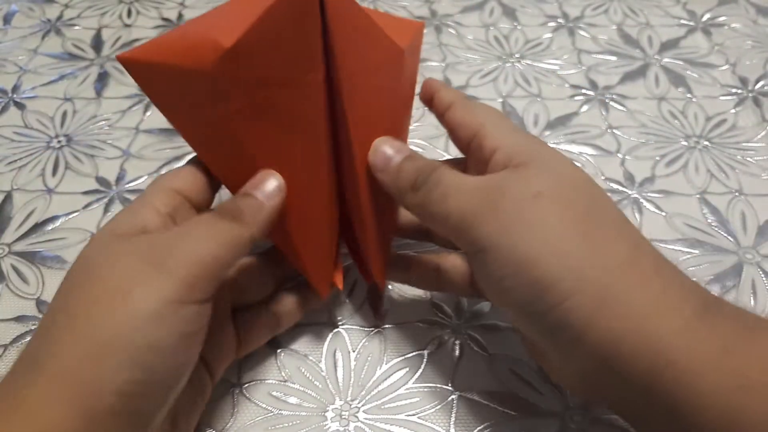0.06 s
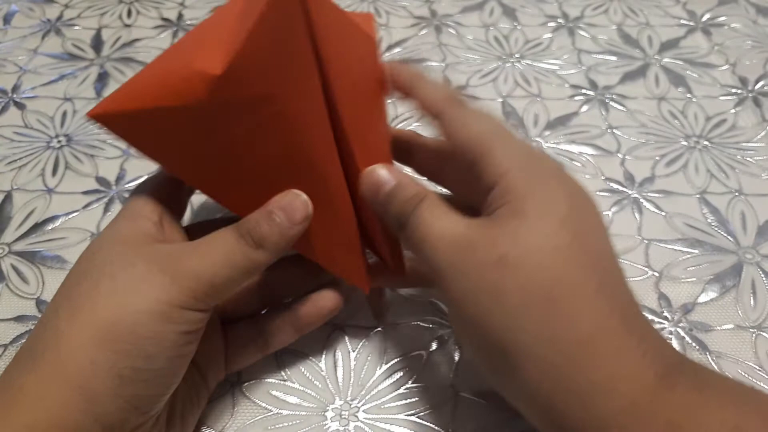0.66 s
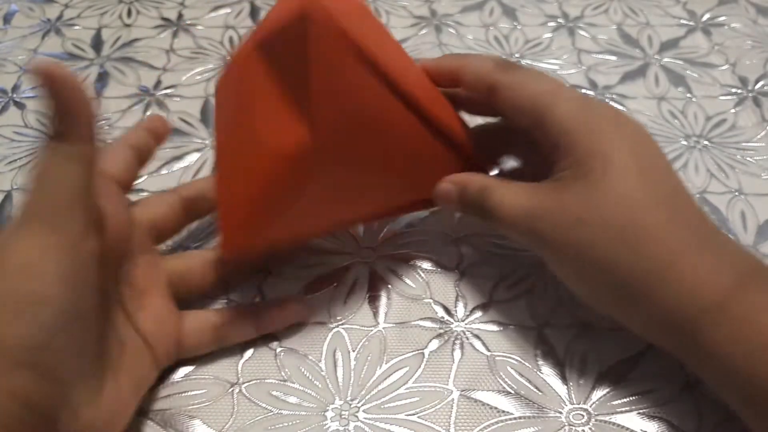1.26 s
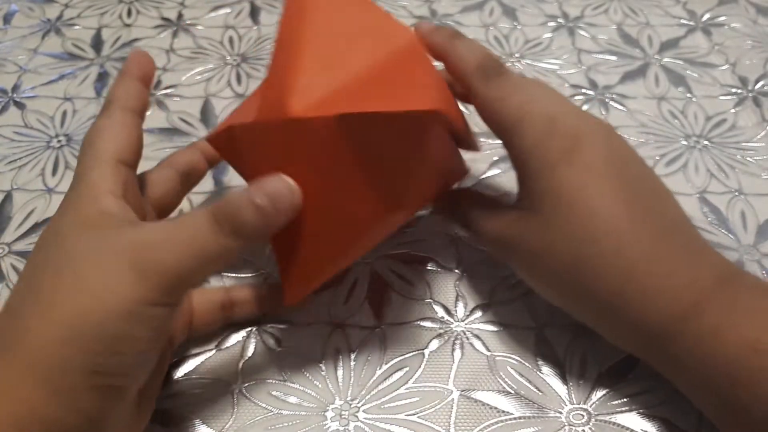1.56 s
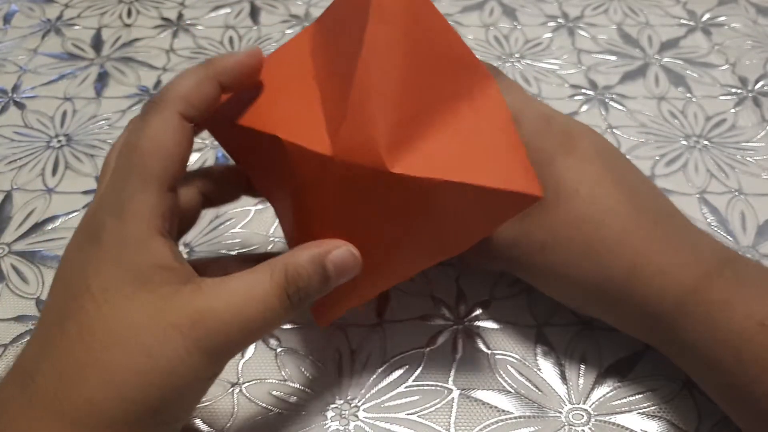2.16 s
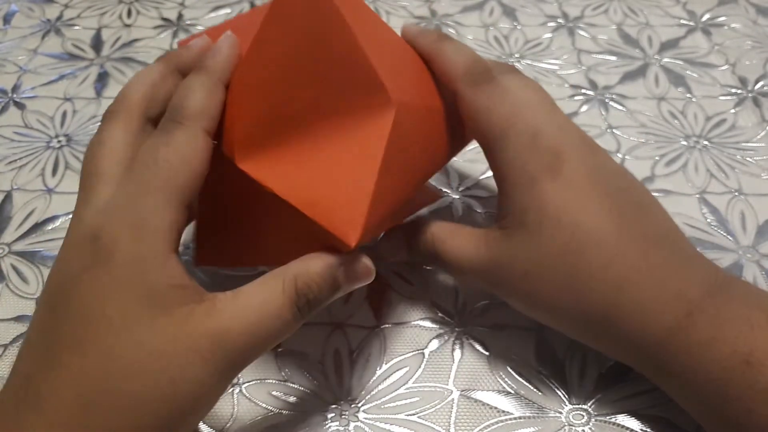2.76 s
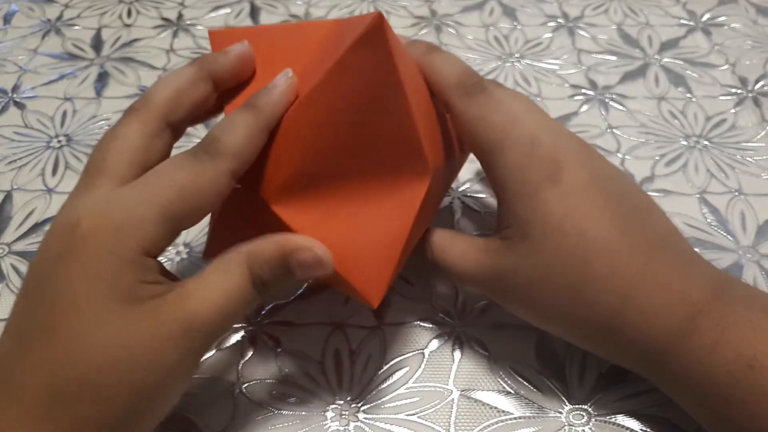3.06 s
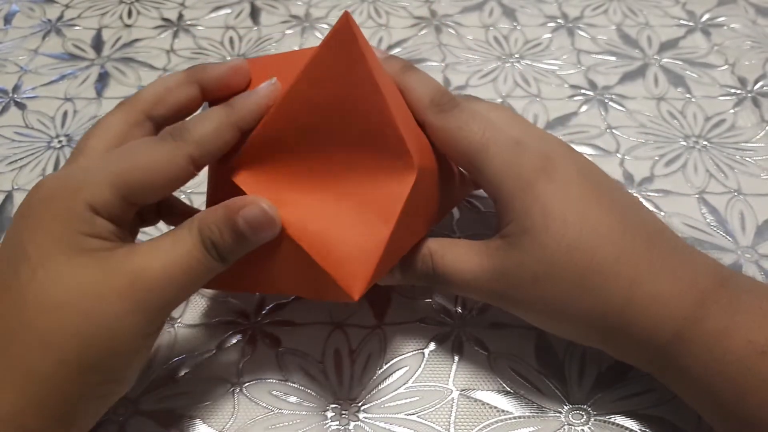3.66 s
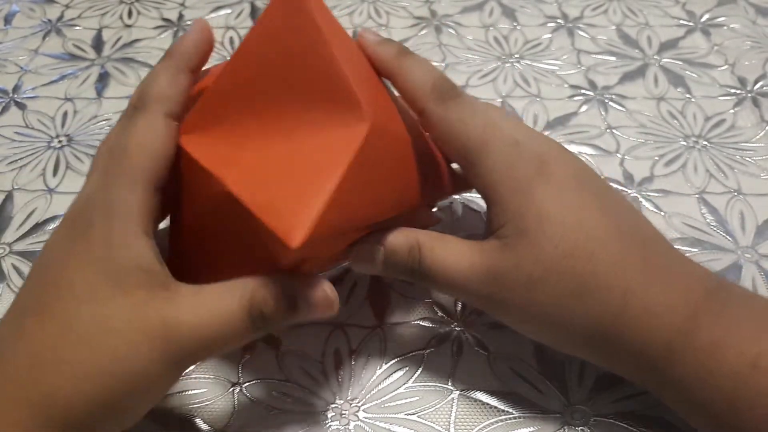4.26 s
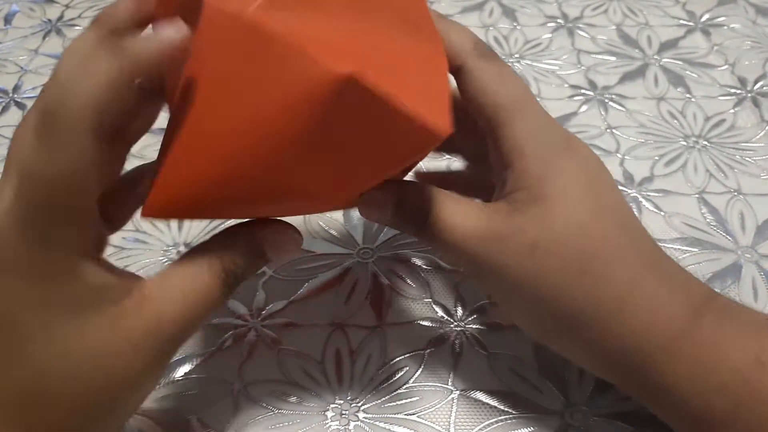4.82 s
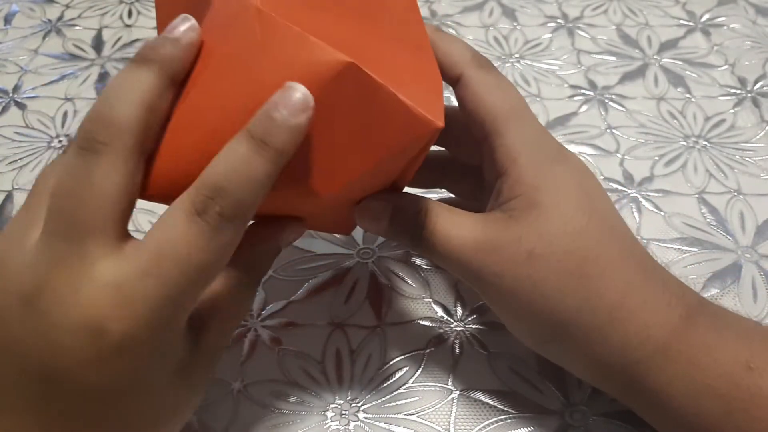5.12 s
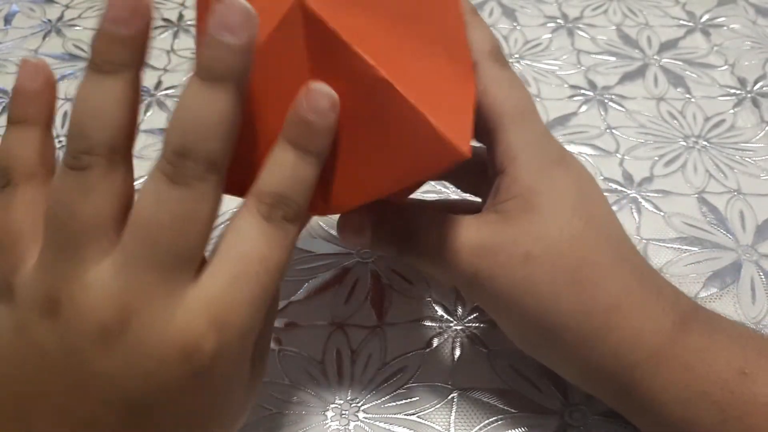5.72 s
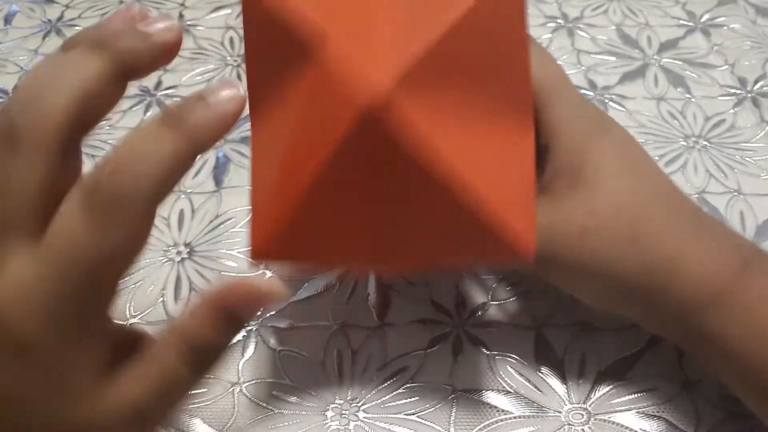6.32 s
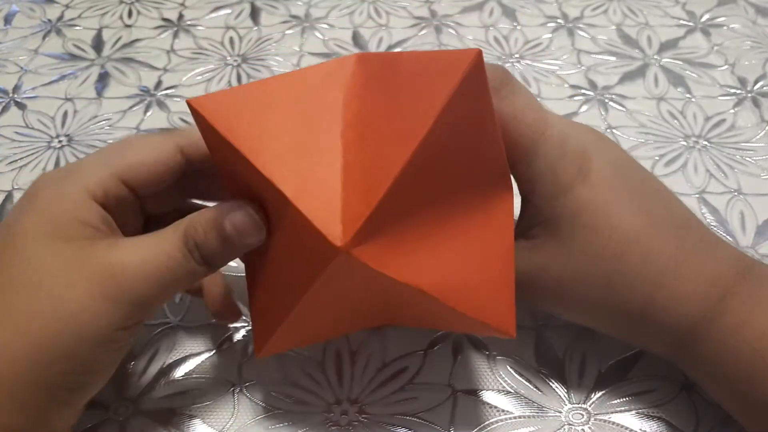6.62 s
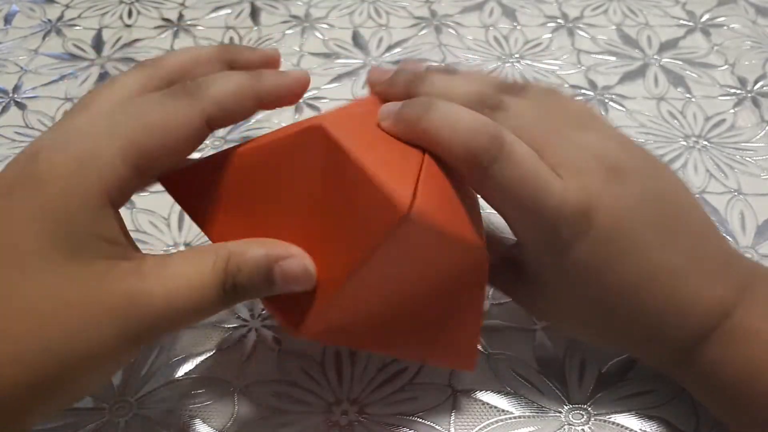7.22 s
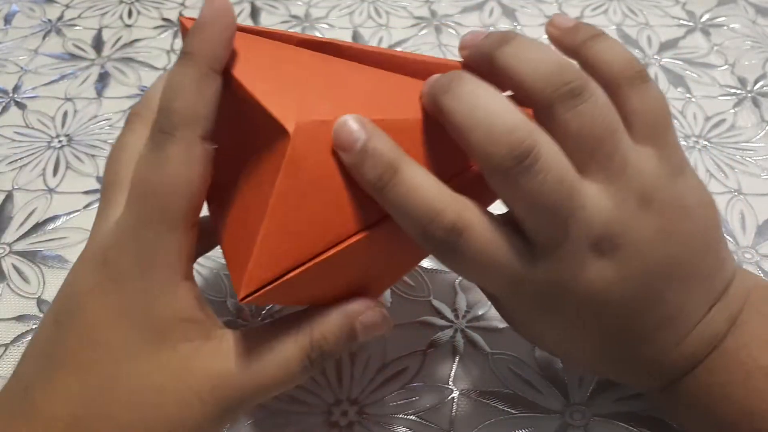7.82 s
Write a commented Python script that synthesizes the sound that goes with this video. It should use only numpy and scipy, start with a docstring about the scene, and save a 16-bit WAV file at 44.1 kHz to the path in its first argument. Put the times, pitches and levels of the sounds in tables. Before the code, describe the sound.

Two hands open out a folded paper model over a table in a small room. Fingers slide and rub on the sheet with a soft hiss and scuff, while creases tick and stiff panels buckle with short, dull snaps. The snaps come irregularly, with a strong one near the middle and another at the very end. The paper sounds close and slightly left, over a low motor hum and a rumble of air.

```python
"""A small room, where two hands open out a folded paper model over a table.
Stiff panels buckle with dull snaps and creases tick: each sudden slip excites damped modes of the
paper, and the walls reflect the sound. Fingers slide and rub on the sheet, whose stick-slip friction
gives a hiss and a scuff. Behind them a motor, probably a fan, hums over a rumble of moving air."""
import sys
import numpy as np
from scipy import signal
from scipy.fft import rfft, irfft, next_fast_len
from scipy.io import wavfile
from scipy.ndimage import uniform_filter1d

SR = 44100
rng = np.random.default_rng(int(sys.argv[2]) if len(sys.argv) > 2 else 0)


def master_out(mix):
    """Clip the mix to full scale and print it as 16-bit PCM to the path in sys.argv[1]."""
    frames = np.transpose(np.atleast_2d(mix))
    ceiling = np.clip(frames, -1, 1)
    pcm = np.round(ceiling * 32767).astype(np.int16)
    wavfile.write(sys.argv[1], SR, pcm)


N = 351917

# Levels in the tables are relative; each source applies its own gain.
# Spectrum of the moving air: frequency_hz, level_db
RUMBLE_SPECTRUM = [(25, -16), (45, -21.5), (90, -16.5), (150, -10), (240, -7), (400, -10), (600, -20.5),
                   (900, -16), (1400, -25), (2900, -30), (3500, -41), (7400, -35.5), (8400, -46),
                   (16000, -51)]
# Likeness of the rumble on the two sides: frequency_hz, coherence (capped at 1)
RUMBLE_COHERENCE = [(60, 1.2), (140, 0.7), (290, 0.86), (640, 0.53), (1400, 0)]
# Lean of the rumble: frequency_hz, left_minus_right_db
RUMBLE_BALANCE = [(100, 0.59), (250, 1.3), (700, 4.3), (5000, 4), (15000, 2.4)]
# Slow swell of the hum: time_s, level_db
HUM_SWELL = [(0, -67), (.29, -49), (.47, -59), (.84, -51), (1.2, -57), (1.83, -47.5), (2.09, -55.5),
             (2.25, -50.5), (2.67, -52.5), (2.8, -48.5), (3.07, -54.5), (3.19, -66), (3.4, -52),
             (3.81, -53), (4.03, -61), (4.2, -52.5), (4.62, -47), (4.73, -61), (4.99, -59), (5.09, -52.5),
             (5.34, -58.5), (5.43, -50.5), (6.06, -51), (6.44, -50.5), (6.79, -53.5), (6.89, -49),
             (7.42, -62), (7.61, -47), (7.89, -56.5)]
# Weaker motor tones: pitch_hz, level_db
MOTOR_TONES = [(100, -66.5), (300, -65), (352, -64.5), (801, -67.5)]
# Reverberation time of the room: frequency_hz, t60_s
ROOM_DECAY = [(200, 0.34), (600, 0.48), (1050, 0.22), (1600, 0.35), (2800, 0.39), (3800, 0.23),
              (10000, 0.08)]
# Modes of a hard object nearby: pitch_hz, width_hz, level_db
NEARBY_MODES = [(1685, 9, -3.5), (3030, 12, -13)]
# Finger strokes: peak_s, rise_s, fade_s, hiss_db, air_db, scuff_db
FINGER_STROKES = [(.03, 0.27, 0.067, -65, -89, -64), (.23, 0.17, 0.71, -62, -71.5, -69),
                  (.45, 0.037, 0.16, -64, -76, -64.5), (.63, 0.046, 0.21, -62, -77, -58.5),
                  (.845, 0.052, 0.59, -60, -72, -64), (1.06, 0.1, 0.086, -60, -75, -65),
                  (1.19, 0.13, 0.12, -62.5, -70.5, -86), (1.442, 0.13, 0.14, -57, -64.5, -59),
                  (1.6, 0.2, 0.53, -62, -72, -59.5), (2.22, 0.11, 0.49, -65.5, -76, -70),
                  (2.46, 0.036, 0.1, -64.5, -68.5, -78), (2.86, 0.2, 0.17, -58, -66.5, -63.5),
                  (3.1, 0.5, 1, -66, -81, -70.5), (3.285, 0.06, 0.082, -60, -65.5, -66),
                  (3.67, 0.05, 0.25, -64, -80, -62), (3.89, 0.07, 0.13, -59, -76, -61),
                  (4.02, 0.12, 0.088, -63, -75, -68), (4.33, 0.18, 0.23, -61, -78, -75),
                  (4.56, 0.55, 0.54, -62, -70.5, -66), (4.79, 0.061, 0.077, -61.5, -70, -67),
                  (4.93, 0.084, 0.17, -58.5, -67, -59), (4.945, .02, .025, -66, -61, -76),
                  (4.992, 0.018, 0.032, -63, -61, -55), (5.175, 0.028, 0.044, -58.5, -63, -76),
                  (5.27, 0.14, 0.22, -71, -78, -74), (5.62, 0.31, 0.15, -60, -73, -60),
                  (5.75, 0.11, 0.19, -59.5, -67, -72), (5.915, 0.044, .04, -63, -66, -76),
                  (5.98, 0.32, 0.15, -62, -70, -61), (6.008, .025, .025, -55, -66, -70),
                  (6.72, 0.3, 0.4, -67, -79, -69), (7.265, 0.54, 0.16, -67, -92, -65),
                  (7.335, 0.12, 0.13, -56.5, -72, -70), (7.47, 0.049, 0.091, -64.5, -72, -65),
                  (7.57, 0.058, 0.22, -68, -82, -66), (7.75, 0.2, 0.19, -60.5, -73, -66.5),
                  (7.91, 0.05, 0.46, -61, -74, -61.5)]
# Friction of hands that merely hold the paper: hiss_db, air_db, scuff_db
HOLDING_LEVELS = [-75.5, -95, -101]
# Spectrum of a sliding finger: frequency_hz, level_db
SLIDE_SPECTRUM = [(200, -58), (500, 1), (1000, 8), (2000, -3.5), (2900, 6), (3500, 2.5), (5000, 0.5),
                  (7400, -1.5), (8400, -11.5), (11500, -13), (16000, -32)]
# Spectrum of a dragging grip: frequency_hz, level_db
RUB_SPECTRUM = [(150, -22), (400, -2.5), (850, -2.5), (1200, -3), (1700, -8), (2300, -12), (3100, -21),
                (3800, -14), (8000, -42)]
# Modes of the folded sheet: pitch_hz, width_hz, level_db
SHEET_MODES = [(430, 110, 8), (770, 114, 10), (1070, 58, 2), (1650, 240, -3)]
# Spectrum of cracking fibres: frequency_hz, level_db
FIBRE_SPECTRUM = [(500, -40), (2500, 2), (3700, 7), (4900, 2), (6600, -2.5), (7600, -3.5), (8500, -16),
                  (11500, -11), (16000, -17)]
# Creases that slip at random: pitch_hz
STRAY_PITCHES = [3000, 5200, 9500]
# The two modes of a ticking crease: ratio_to_pitch
CREASE_MODES = [0.876, 1.135]
# Crease slips and fingertip landings: start_s, body_db, crack_db, crack_hz, slip_ms
CREASE_TICKS = [(.1015, -54, -73, 4000, 0.27), (.217, -63, -62, 6000, .55), (.426, -59, -74, 3000, 0.4),
                (.445, -59, -64, 5000, 0.64), (.474, -54.5, -65, 4020, 0.39),
                (0.562, -58, -65.5, 7000, 0.74), (0.622, -48, -56.5, 9400, 2.3),
                (.64, -56, -63, 11000, 1.7), (.678, -71, -57, 4360, 0.14), (.823, -64, -62.5, 6500, 3.4),
                (0.862, -54, -61.5, 6500, 1), (.894, -54.5, -58.5, 4450, 0.77),
                (0.9156, -59, -62, 9500, 1.2), (.96, -55, -53.5, 12000, 2), (.992, -53, -66, 5000, 0.6),
                (1.017, -61.5, -72, 4000, 0.44), (1.05, -67, -62, 3500, 0.48), (1.073, -58, -63, 6630, 1.7),
                (3.06, -54.5, -60, 5500, 3.5), (3.458, -53, -69, 4000, 2), (3.483, -53.5, -69, 4000, 3.1),
                (3.586, -59, -61, 6430, 2.6), (3.607, -56, -70, 6040, 1.2), (3.614, -59, -56, 5000, 0.97),
                (4.546, -58, -64, 3000, 0.71), (4.588, -62, -65, 6960, 2), (4.719, -75, -76, 6700, .5),
                (4.731, -62, -58.5, 6300, 0.47), (4.778, -61, -65.5, 6000, 1.4),
                (4.908, -60.5, -68, 9000, .8), (4.93, -61, -54.5, 11100, 1.7), (4.984, -59, -62, 9000, 4.8),
                (5.003, -52, -58.5, 3400, 0.94), (5.66, -56.5, -54.5, 11500, 2.7),
                (5.688, -54.5, -55, 3000, 0.53), (5.703, -48, -52.5, 11600, 4.6),
                (5.782, -56, -77, 10500, 1.7), (5.814, -57, -65.5, 10500, 2.6),
                (5.8448, -53.5, -65, 9000, 1.6), (5.9, -50, -88, 3000, 0.46),
                (5.92, -51.5, -67, 5000, 1.15), (6.122, -63, -75, 7100, .7),
                (6.748, -71, -64.5, 5300, 0.73), (7.111, -60, -69, 6800, 1.5),
                (7.237, -60, -61.5, 8200, 1.4), (7.247, -70, -63.5, 8100, 1),
                (7.326, -58.5, -66, 8000, 1.6), (7.333, -58, -61, 6500, 0.61),
                (7.347, -76, -70, 11000, 1.1), (7.553, -61, -60.5, 7300, 2.1), (7.562, -64, -64, 7500, 2.7),
                (7.602, -66, -63, 5000, 1.1)]
# Bandwidths of hollow, panel, facet and crease: width_to_pitch_ratio
SNAP_WIDTHS = [0.82, 0.42, 0.29, 0.19]
# Buckling panels: start_s, knock_db, hollow_hz, hollow_db, panel_hz, panel_db, facet_hz, facet_db,
# crease_hz, crease_db, crack_db, crack_hz, left_minus_right_db, flutter_ms
PANEL_SNAPS = [(0.0484, -55, 440, -49, 793, -42, 1470, -46.5, 2600, -80, -74, 4560, -2, 0.52),
               (0.6076, -60, 400, -52, 806, -52, 1750, -64.5, 3080, -51.5, -54, 5100, 0.5, 0.46),
               (0.6277, -47.5, 555, -41.5, 900, -39.5, 1670, -39.5, 2880, -40.5, -48, 5400, -5.5, 0.36),
               (2.193, -52, 334, -44, 834, -42, 1790, -50, 5100, -46, -47.5, 11500, -3, 0.23),
               (2.8974, -48, 326, -42, 930, -40.5, 1650, -68, 3000, -64, -73, 4500, -1, 0.85),
               (2.9032, -62, 516, -44, 1090, -41.5, 1700, -39, 3430, -40.5, -52, 5500, -6, 0.49),
               (3.4419, -64, 390, -52.5, 790, -48, 1500, -87.5, 2700, -86, -78, 4500, -4, 0.58),
               (3.6313, -46.5, 480, -44, 930, -30.5, 2130, -40, 2940, -40.5, -39.5, 5400, -2, 0.38),
               (5.289, -62, 400, -76, 744, -53.5, 1490, -82, 2630, -84, -84, 4500, -1, 0.12),
               (5.4686, -52, 580, -39, 900, -41.5, 1600, -34, 2850, -45.5, -47, 5800, 0, 0.35),
               (6.0008, -68, 400, -73, 755, -43, 1400, -46, 2520, -50, -66, 6000, -3.5, 0.71),
               (7.8125, -75, 400, -66, 810, -50, 1550, -46.5, 2870, -46.5, -55, 5500, -0.5, 0.31),
               (7.9533, -38, 310, -39, 790, -42.5, 1520, -40, 2720, -43.5, -52.5, 5600, 0, 0.98)]
# Dips in the microphone's response: centre_hz, width_hz, depth_fraction
MIC_NOTCHES = [(3630, 300, 0.4), (8480, 1260, 0.3)]


def amp(db):
    """Amplitude ratio of a level in decibels."""
    return 10 ** (np.asarray(db) / 20)


def unit(x):
    """Normalisation to rms 1."""
    return x / np.sqrt(np.mean(x ** 2) + 1e-20)


def curve_at(points, hz):
    """Interpolation on a logarithmic frequency axis."""
    frequencies, values = np.transpose(points)
    return np.interp(np.log(hz + 1), np.log(frequencies + 1), values)


def add(mix, start_s, sound):
    """Superposition of a sound on the mix."""
    part = mix[:, max(round(start_s * SR), 0):][:, :sound.shape[1]]
    part += sound[:, :part.shape[1]]


def drift(rate_hz):
    """Slow random modulation: low-passed noise of rms 1."""
    size = next_fast_len(N)
    hz = np.fft.rfftfreq(size, 1 / SR)
    return unit(irfft(rfft(rng.standard_normal(size)) / (1 + (hz / rate_hz) ** 4), size)[:N])


def colour(x, spectrum, size=2048):
    """Minimum-phase filtering to a given spectrum."""
    log_gain = np.log(amp(curve_at(spectrum, abs(np.fft.fftfreq(size, 1 / SR)))))
    taps = np.fft.ifft(np.exp(np.conj(signal.hilbert(log_gain)))).real
    return signal.oaconvolve(x, taps[None, :size // 2])[:, :x.shape[1]]


def whiten(x, width_hz=240):
    """Inverse filtering levels the broad spectral humps of a burst."""
    hz = np.fft.rfftfreq(x.shape[1], 1 / SR)
    power = (abs(rfft(x)) ** 2).mean(0)
    bins = max(round(width_hz / hz[1]), 3)
    power = uniform_filter1d(uniform_filter1d(power, bins), bins)
    return colour(x, np.column_stack([hz, -10 * np.log10(power / power.mean() + 1e-6)]))


def ring(x, hz, width_hz):
    """Second-order resonance of peak gain 1."""
    return signal.lfilter(*signal.iirpeak(hz, hz / width_hz, fs=SR), x)


def mode(x, hz, width_ratio):
    """Two resonators in cascade give a damped mode with steep sides."""
    width_hz = min(width_ratio * hz, SR / 3)
    return unit(ring(ring(x, hz, width_hz), hz, width_hz))


def soften(x, edge_hz):
    """A soft contact acts as a low-pass filter."""
    return signal.sosfilt(signal.butter(2, min(edge_hz, SR / 3), fs=SR, output="sos"), x)


def place_left(x, right_db, delay_samples=5):
    """Path difference: the farther, right microphone hears the paper later and softer."""
    return np.array([x[0], amp(right_db) * np.pad(x[1], (delay_samples, 0))[:N]])


def air_rumble():
    """Spatial coherence: air and room noise are alike on both sides in the bass, unrelated higher up."""
    hz = np.fft.rfftfreq(N, 1 / SR)
    left, independent = rfft(rng.standard_normal((2, N)))
    coherence = np.clip(curve_at(RUMBLE_COHERENCE, hz), -1, 1)
    right = coherence * left + np.sqrt(1 - coherence ** 2) * independent
    lean_db = curve_at(RUMBLE_BALANCE, hz) / 2
    both = np.array([left * amp(lean_db), right * amp(-lean_db)])
    return amp(-50) * unit(irfft(both * amp(curve_at(RUMBLE_SPECTRUM, hz)), N))


def motor_tone(pitch_hz, wander_hz, wander_rate_hz, waver_db, waver_rate_hz):
    """Random frequency and amplitude modulation make a sinusoid waver."""
    phase = 2 * np.pi * np.cumsum(pitch_hz + wander_hz * drift(wander_rate_hz)) / SR
    return unit(np.sin(phase) * amp(waver_db * drift(waver_rate_hz)))


def motor():
    """Periodic vibration gives a line spectrum: a swelling hum and a few weaker tones."""
    swell = amp(0.5 + np.interp(np.arange(N) / SR, *np.transpose(HUM_SWELL)))
    hum = swell * motor_tone(199.8, wander_hz=1.49, wander_rate_hz=8.2, waver_db=2.54, waver_rate_hz=18)
    for hz, db in MOTOR_TONES:
        tone = motor_tone(hz, wander_hz=2.445, wander_rate_hz=6.92, waver_db=3.1, waver_rate_hz=20.5)
        hum += amp(db) * tone
    return hum * amp([[0.6], [-0.6]])


def room_response(size=17640, reflections_per_s=4000):
    """Reverberation: sparse reflections decay exponentially, each band at its own rate."""
    taps = rng.choice([-1., 1.], (2, size)) * (rng.random((2, size)) < reflections_per_s / SR)
    taps[:, :SR // 400] = 0  # gap before the first reflection
    hz, t, bands = signal.stft(whiten(taps), SR, nperseg=128)
    tail = signal.istft(bands * amp(-60 * t / curve_at(ROOM_DECAY, hz)[:, None]), SR)[1]
    return tail / np.linalg.norm(tail, axis=1, keepdims=True)


def nearby_object(x):
    """Sympathetic resonance: something hard rings on after the snaps and ticks."""
    return sum(amp(db) * ring(x, hz, width_hz) for hz, width_hz, db in NEARBY_MODES)


def stroke_envelopes(points=4000, depth_db=16, rise_power=1.1, fade_power=1.07):
    """Incoherent strokes add in power; returns the gains of hiss, airy top and scuff."""
    t = np.linspace(0, N / SR, points)
    power = np.outer(amp(HOLDING_LEVELS) ** 2, np.ones(points))
    for peak_s, rise_s, fade_s, *levels_db in FINGER_STROKES:
        away_s = abs(t - peak_s)
        fall = np.where(t < peak_s, (away_s / rise_s) ** rise_power, (away_s / fade_s) ** fade_power)
        power += np.outer(amp(levels_db), amp(-depth_db * fall)) ** 2
    return [np.interp(np.arange(N) / SR, t, gain) for gain in np.sqrt(power)]


def friction(grains_per_s, spread_db, hiss_db, clump_db):
    """Stick-slip friction: tiny catches come in clumps over a smooth hiss from the whole sheet."""
    strength = amp(spread_db * np.minimum(rng.exponential(1, N), 4))
    grains = strength * rng.choice([-1, 1], N) * (rng.random(N) < grains_per_s / SR)
    hiss = amp(hiss_db) * rng.standard_normal((2, N))
    return unit((unit(grains) + hiss) * amp(clump_db * drift(32)))


def finger_slide(hiss_gain, air_gain):
    """Sliding friction gives a scratchy hiss; a light, quick stroke adds a fine, airy top."""
    coarse = friction(grains_per_s=1700, spread_db=1, hiss_db=4.5, clump_db=2.13)
    fine = friction(grains_per_s=1500, spread_db=0, hiss_db=7, clump_db=2.5)
    hiss = colour(coarse, SLIDE_SPECTRUM)
    air = signal.sosfilt(signal.butter(2, [9000, 14500], "bandpass", fs=SR, output="sos"), fine)
    return amp(8) * hiss_gain * unit(hiss) + amp(7.5) * air_gain * unit(air)


def grip_rub(gain):
    """Forced vibration: a firm grip drags on the panels, which answer with a dull scuff."""
    drag = friction(grains_per_s=1200, spread_db=3, hiss_db=2, clump_db=1.5)
    return amp(12.5) * gain * unit(colour(drag, RUB_SPECTRUM))


def shifting_contact(x, depth_db):
    """Spectral modulation: as the contact shifts, narrow bands of the friction come and go."""
    bands = signal.stft(x, nperseg=512)[2]
    patches = uniform_filter1d(rng.standard_normal(bands.shape[1:]), size=6, axis=0)
    patches = uniform_filter1d(patches, size=5, axis=1)
    return signal.istft(bands * amp(depth_db * unit(patches)))[1][:, :N]


def slip_force(flutter_db, flutter_s, shake_db, shake_s, grit_db=7, size=1764):
    """Impulsive excitation: a jump, a gritty flutter as the bend spreads, a shake unlike on each side."""
    t = np.arange(size) / SR
    grit = rng.standard_normal(size) * amp(grit_db * rng.standard_normal(size))
    flutter = grit * t * np.exp(-t / flutter_s)
    shake = rng.standard_normal((2, size)) * np.exp(-t / shake_s) * (1 - np.exp(-t / flutter_s))
    tail = (amp(flutter_db) * unit(flutter) + amp(shake_db) * unit(shake)) / np.sqrt(size)
    return whiten((t == 0) + tail)


def sheet(force, pitch_ratio=1):
    """Modal response of the folded sheet, higher in pitch where it is held taut."""
    return sum(amp(db) * ring(force, hz * pitch_ratio, width_hz) for hz, width_hz, db in SHEET_MODES)


def fibre_crack(force, hz):
    """Fibres give way in a broadband burst, shaped by the resonance of their crease."""
    return unit(ring(colour(force, FIBRE_SPECTRUM), hz, min(0.64 * hz, SR / 3)))


def stray_ticks(finger_gain, slips_per_s=3.9, spread_db=2):
    """A Poisson process: each crease gives way at random, harder while the fingers move."""
    out = np.zeros((2, N))
    for hz in STRAY_PITCHES:
        slips = amp(spread_db * rng.uniform(-1, 1, N)) * (rng.random(N) < slips_per_s / SR)
        force = slip_force(flutter_db=6, flutter_s=0.00025, shake_db=13, shake_s=0.0026)
        body = unit(sheet(force, pitch_ratio=rng.uniform(0.58, 1.23)))
        tick = body + amp(10) * fibre_crack(force, hz)
        out += signal.oaconvolve(slips[None], tick, axes=1)[:, :N]
    return amp(-5.5) * finger_gain * unit(out)


def crease_ticks(clean_slip_ms=0.55):
    """Excitation sets timbre: quick slips ring a crease, long ones scrape, fingertips land dully."""
    out = np.zeros((2, N))
    for start_s, body_db, crack_db, crack_hz, slip_ms in CREASE_TICKS:
        force = slip_force(flutter_db=3 + 2 * slip_ms, flutter_s=slip_ms / 1000,
                           shake_db=-3, shake_s=0.0035)
        edge_hz = 2500 * amp(0.5 * (crack_db - body_db))  # a weaker crack goes with a duller body
        body = soften(sheet(force, pitch_ratio=rng.uniform(0.82, 1.2)), edge_hz)
        pitched = unit(sum(mode(force, crack_hz * ratio, width_ratio=0.25) for ratio in CREASE_MODES))
        pitched_share = 1 / (1 + (slip_ms / clean_slip_ms) ** 2)
        scrape = fibre_crack(force, crack_hz)
        crack = unit(np.sqrt(pitched_share) * pitched + np.sqrt(1 - pitched_share) * scrape)
        add(out, start_s, amp(body_db) * unit(body) + amp(crack_db) * crack)
    return out


def panel_snaps(knock_hz=238, sheet_db=-9):
    """Snap-through buckling pushes out air, rings hollow, panel, facet and crease, and cracks fibres."""
    out = np.zeros((2, N))
    for start_s, knock_db, *modes, crack_db, crack_hz, lean_db, flutter_ms in PANEL_SNAPS:
        pitches, gains = modes[::2], amp(modes[1::2])
        panel_gain, facet_hz = gains[1], pitches[2]
        flutter_s = flutter_ms / 1000
        force = slip_force(flutter_db=1.5, flutter_s=flutter_s, shake_db=-2.5, shake_s=7 * flutter_s)
        fibres = slip_force(flutter_db=10.5, flutter_s=1.6 * flutter_s,
                            shake_db=16.5, shake_s=3 * flutter_s)
        knock = amp(knock_db) * mode(signal.unit_impulse(force.shape[1]), knock_hz, width_ratio=1)
        body = sum(gain * mode(force, hz, width) for hz, gain, width in zip(pitches, gains, SNAP_WIDTHS))
        whole_sheet = amp(sheet_db) * panel_gain * soften(unit(sheet(force)), facet_hz)
        crack = amp(crack_db) * fibre_crack(fibres, crack_hz)
        balance = amp([[lean_db / 2], [-lean_db / 2]])
        add(out, start_s, (body + whole_sheet + crack - knock) * balance)
    return out


def scene():
    """Superposition of snaps and ticks, their reverberation, the hands' friction and the background."""
    hiss_gain, air_gain, scuff_gain = stroke_envelopes()
    snaps = place_left(amp(4.5) * panel_snaps(), right_db=-7.5)
    ticks = place_left(amp(6) * crease_ticks() + stray_ticks(hiss_gain), right_db=-8)
    crinkles = snaps + ticks
    walls = amp(-15.5) * signal.fftconvolve(crinkles, room_response(), axes=1)[:, :N]
    fingers = finger_slide(hiss_gain, air_gain) + grip_rub(scuff_gain)
    handling = place_left(shifting_contact(fingers, depth_db=2.5), right_db=-5)
    return crinkles + walls + nearby_object(crinkles) + handling + motor() + air_rumble()


def record(dry):
    """Frequency response of the microphone: bass roll-off, two notches and a band limit."""
    bass_hz, edge_hz = 69, 15900
    dry = signal.sosfilt(signal.butter(2, bass_hz, "highpass", fs=SR, output="sos"), dry)
    for hz, width_hz, depth in MIC_NOTCHES:
        dry = dry - depth * ring(dry, hz, width_hz)
    band_limit = signal.firwin(511, edge_hz, window=("kaiser", 9), fs=SR)
    return signal.oaconvolve(dry, band_limit[None], "same")


dry = scene()
out = record(dry)
master_out(out)
```